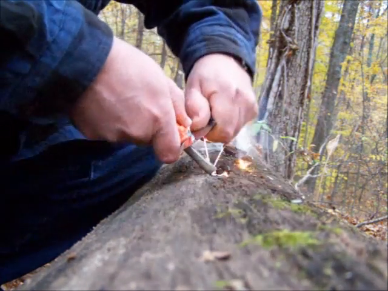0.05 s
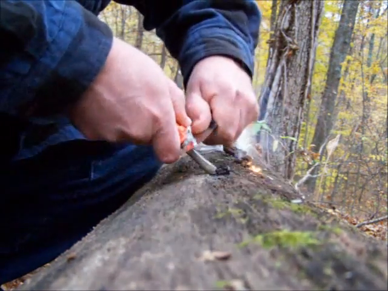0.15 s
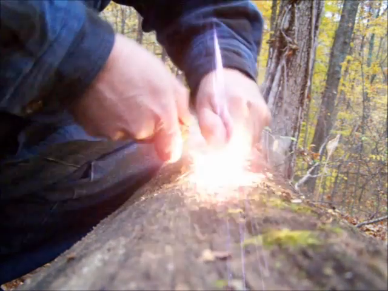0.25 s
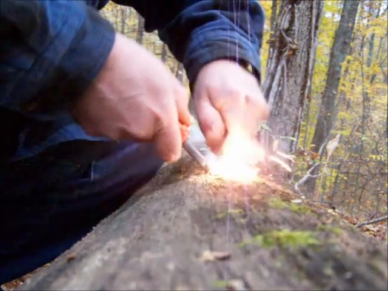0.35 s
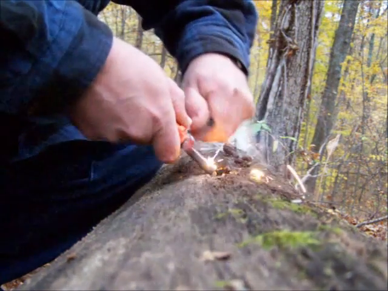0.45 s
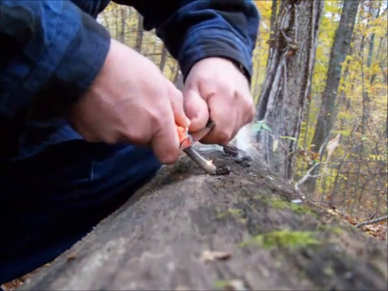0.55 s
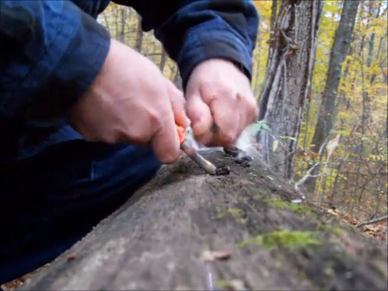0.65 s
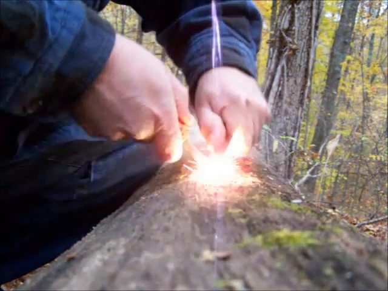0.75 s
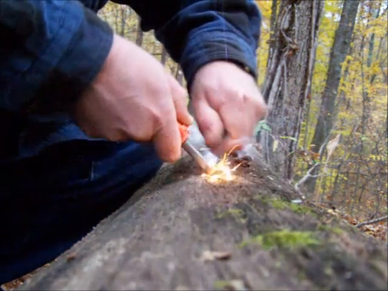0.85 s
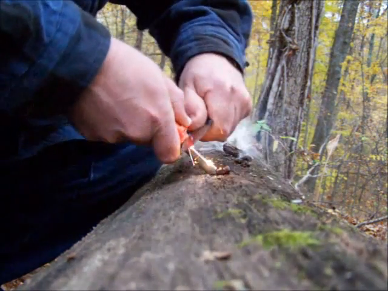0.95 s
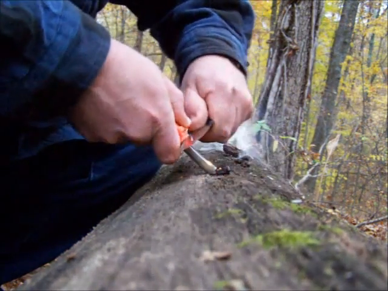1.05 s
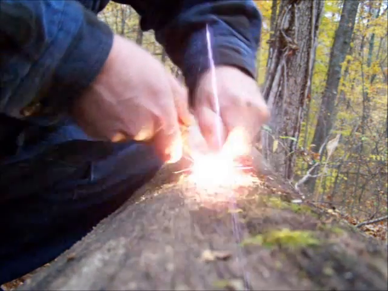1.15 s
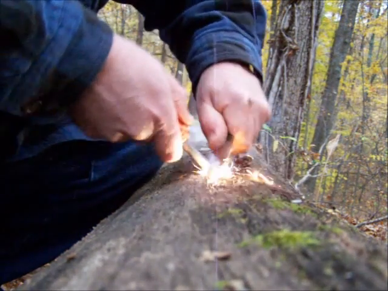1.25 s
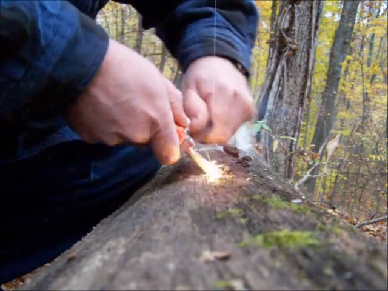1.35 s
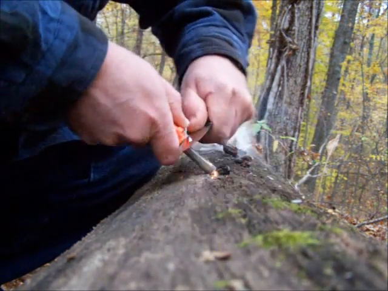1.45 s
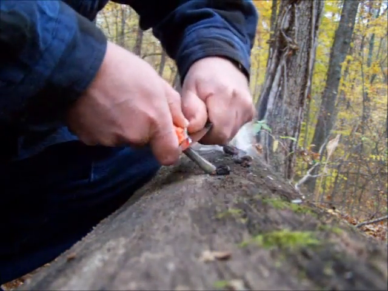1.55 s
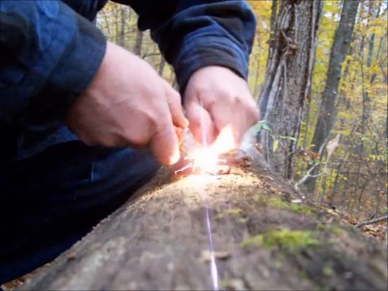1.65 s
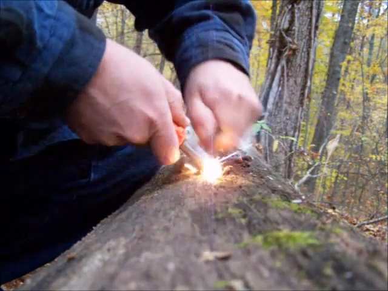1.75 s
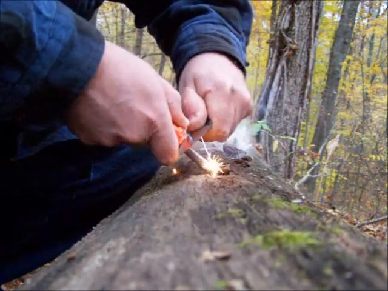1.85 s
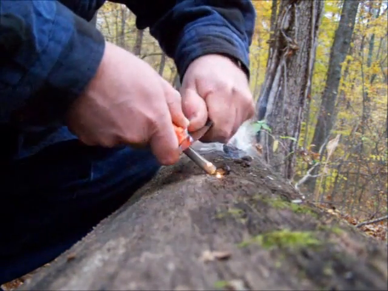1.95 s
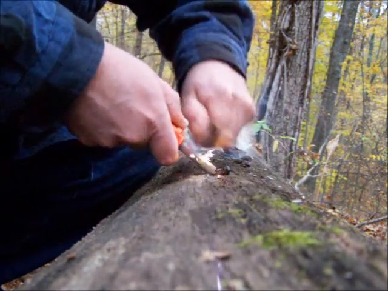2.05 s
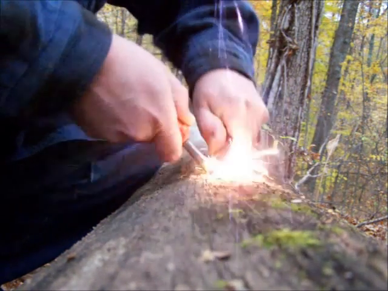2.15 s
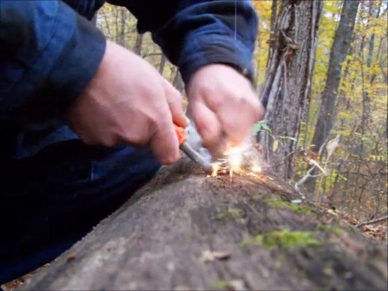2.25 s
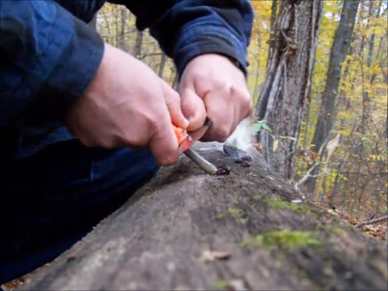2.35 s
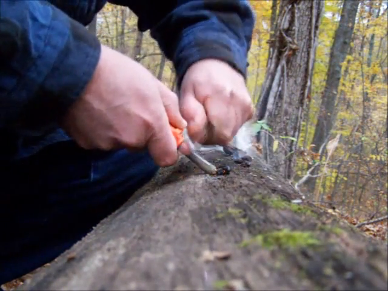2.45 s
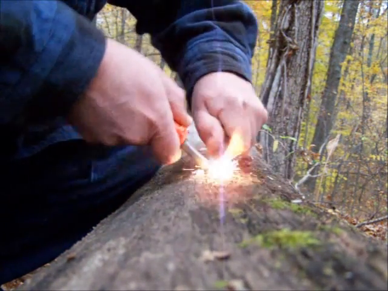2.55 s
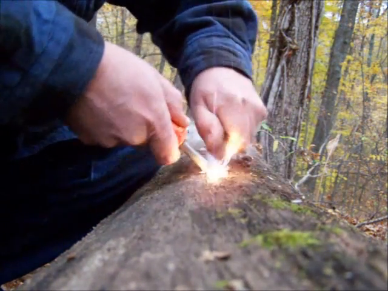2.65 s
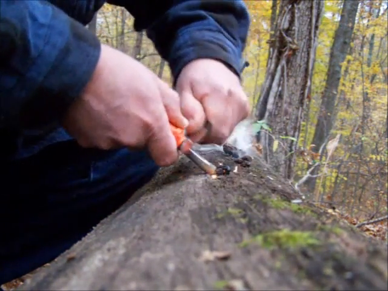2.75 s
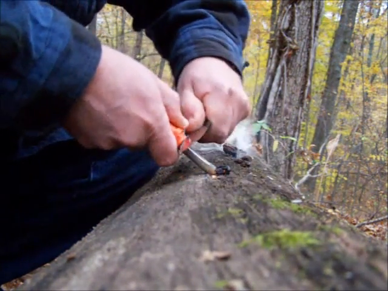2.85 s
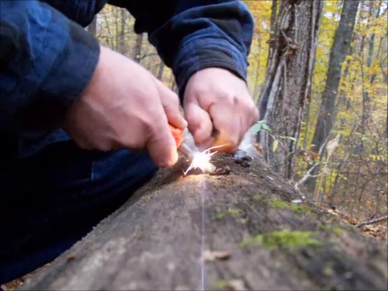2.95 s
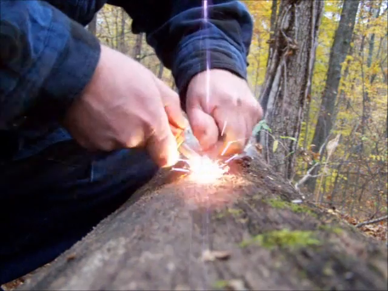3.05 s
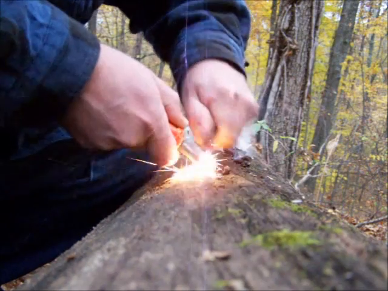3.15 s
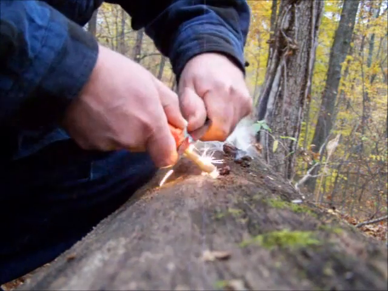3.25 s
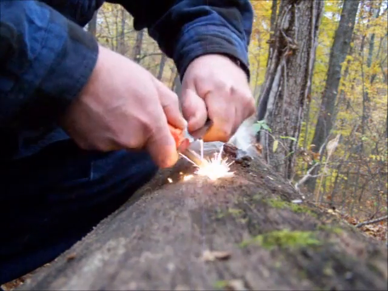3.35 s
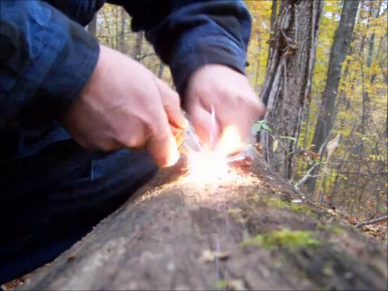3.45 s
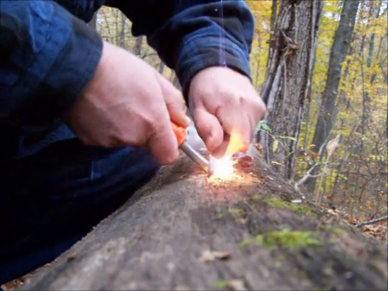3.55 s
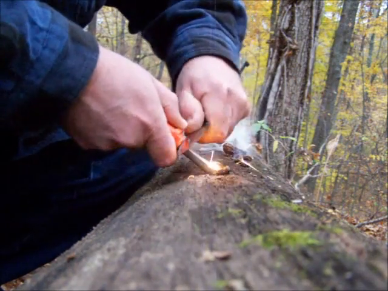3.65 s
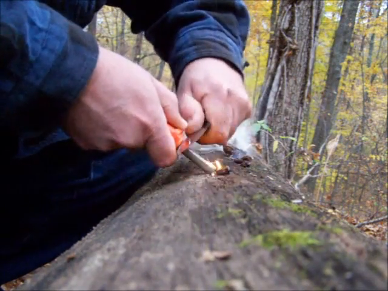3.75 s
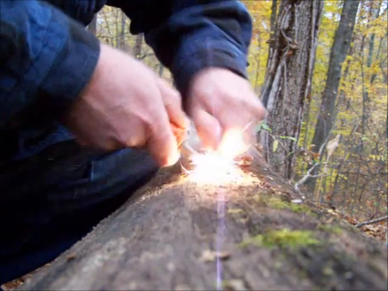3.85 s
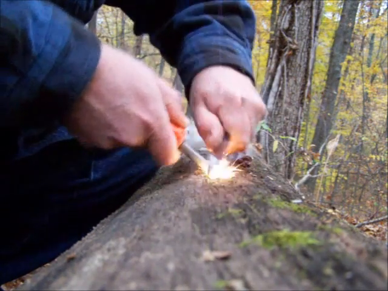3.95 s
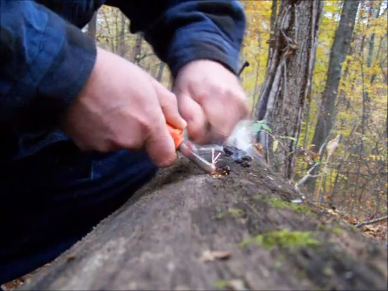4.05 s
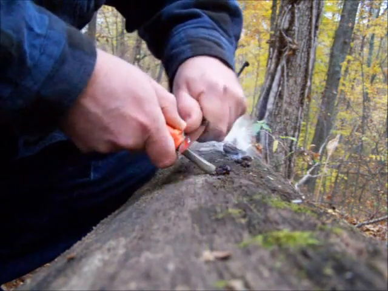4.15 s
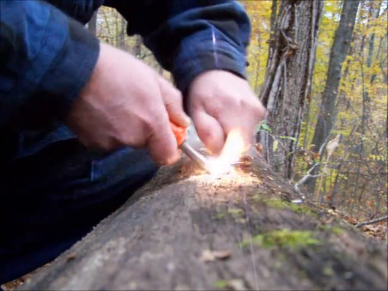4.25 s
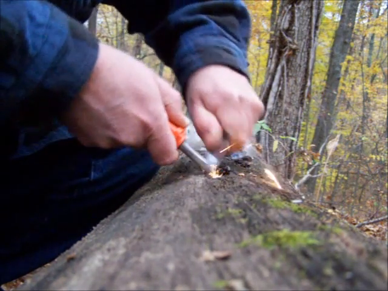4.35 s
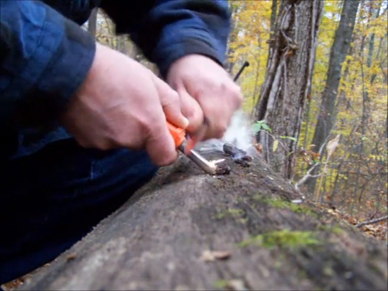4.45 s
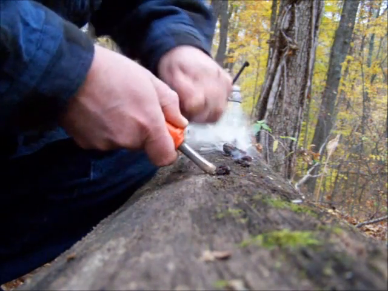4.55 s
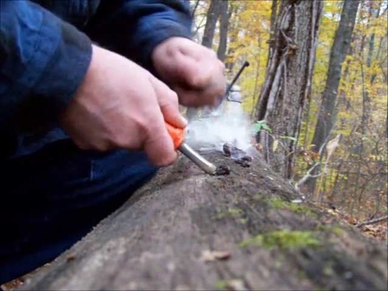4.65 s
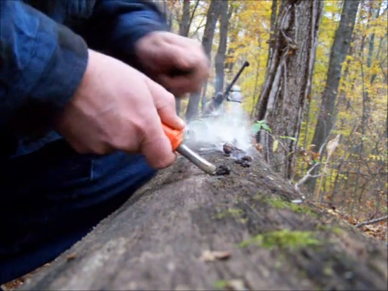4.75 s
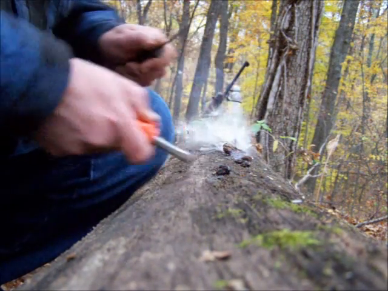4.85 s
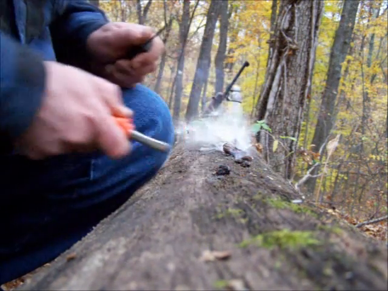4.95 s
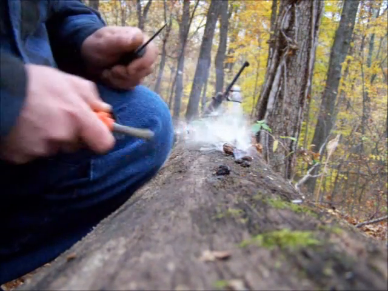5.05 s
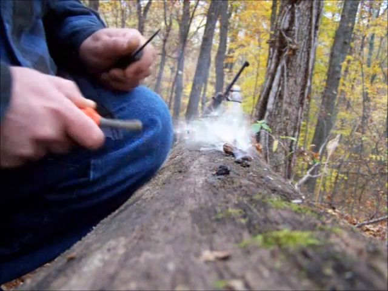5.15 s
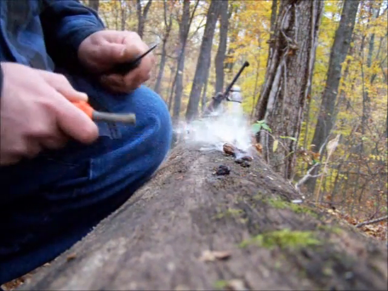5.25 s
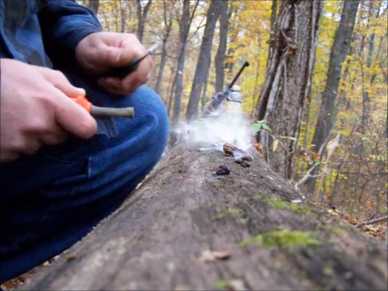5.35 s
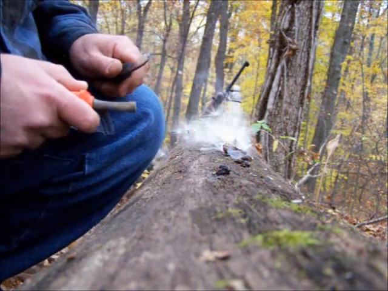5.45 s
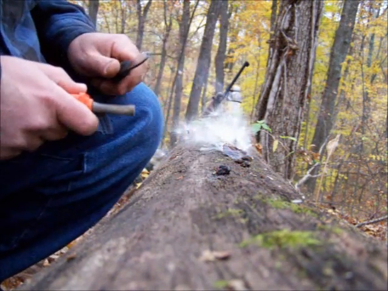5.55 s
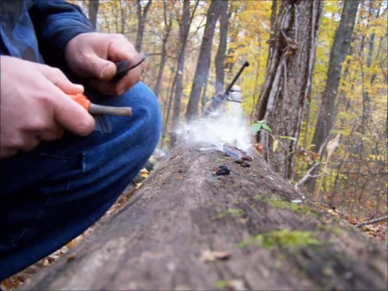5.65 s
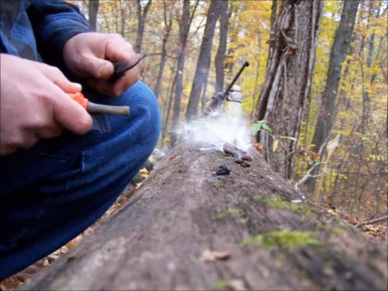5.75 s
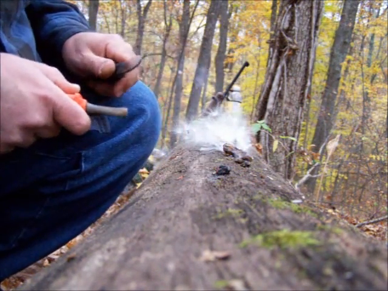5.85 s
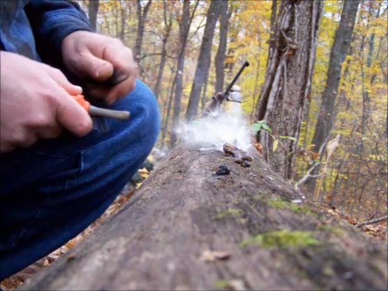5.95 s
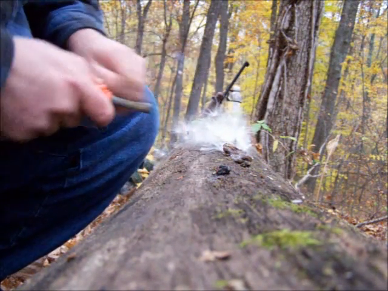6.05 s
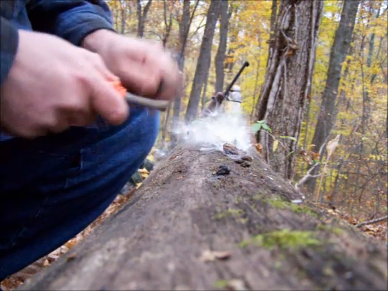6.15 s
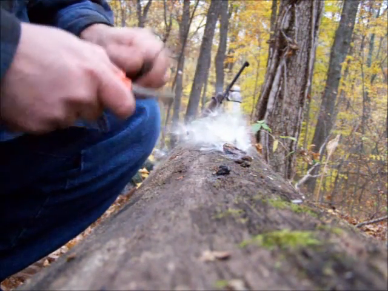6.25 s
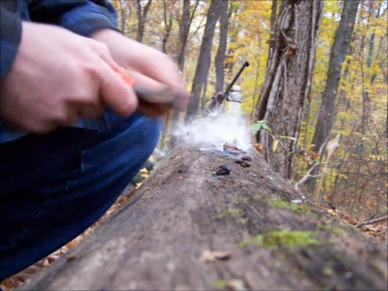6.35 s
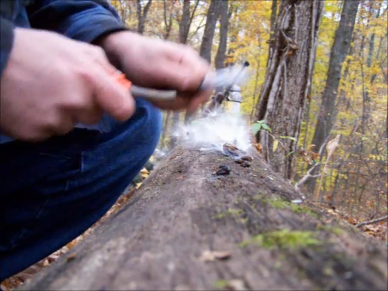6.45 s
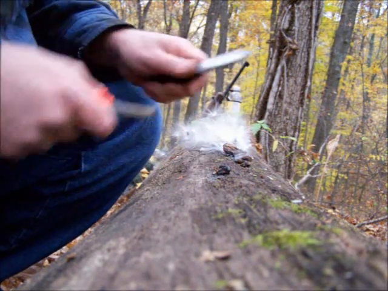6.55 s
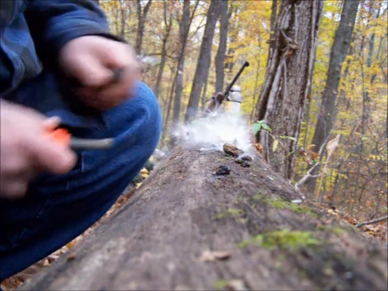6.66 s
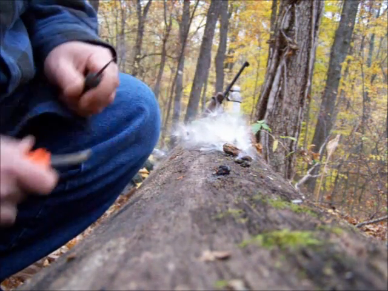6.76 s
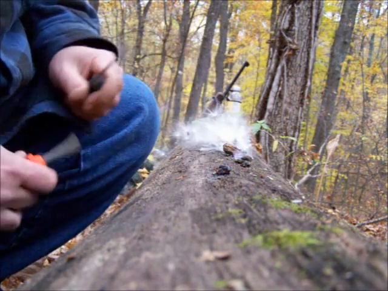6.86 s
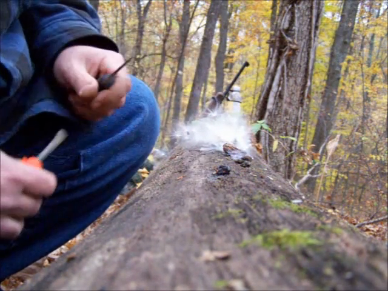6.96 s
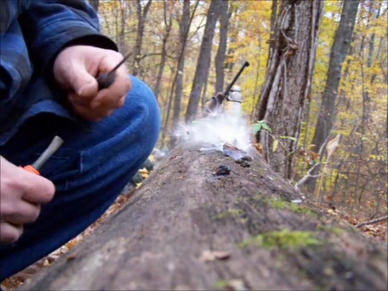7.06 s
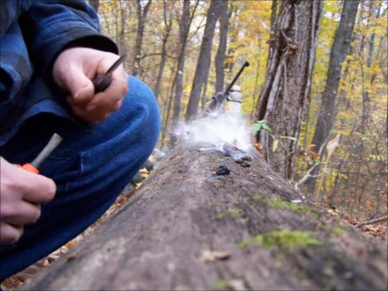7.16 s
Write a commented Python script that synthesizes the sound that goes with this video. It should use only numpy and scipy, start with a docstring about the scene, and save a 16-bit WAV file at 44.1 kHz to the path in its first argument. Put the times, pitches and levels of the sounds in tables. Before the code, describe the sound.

A steel blade rasps down a fire-starting rod about twice a second, tearing off crackling sparks, then two sharp clinks over faint hiss and hum.

```python
"""A steel blade scrapes along a ferro rod about twice a second, as someone kneels at a log in a wood.
Each push tears off crackling sparks, made of random grains; the return is a lighter, ringing rasp.
Sharp impulses through resonances make the ticks, knocks on the log and snapping twigs.
Later the blade clinks twice, as fading sine waves, and dry leaves rustle under the shifting body.
Behind it are a far engine built from sine waves, a faint drone and a steady hiss of shaped noise."""
import sys
import numpy as np
from scipy import signal
from scipy.fft import rfft, irfft
from scipy.io import wavfile
from scipy.ndimage import uniform_filter1d

SR = 44100
rng = np.random.default_rng(int(sys.argv[2]) if len(sys.argv) > 2 else 0)


def master(y):
    """Save y as 16-bit WAV."""
    cut = np.clip(np.atleast_2d(y).T, -1, 1)
    pcm = np.round(cut * 32767)  # scale
    wavfile.write(sys.argv[1], SR, pcm.astype(np.int16))


N = 318402
TIME = np.arange(N) / SR   # seconds
# Table levels are relative: each layer adds its own level on top.

# The edge is pushed down the rod:
# (time [s], time to the crest [s], time after it [s], crest level [dB],
#  swell from ends to crest [dB], relative ring of the rod [dB])
PUSHES = [(.04, .068, .057, -15.5, 16, -4.5), (.5, 0.11, 0.082, -16.5, 18, -4.5),
          (.985, 0.077, 0.058, -15, 19, -4.5), (1.441, 0.095, 0.066, -17, 7.5, -4.5),
          (1.905, 0.062, 0.051, -15, 9.5, -3.5), (2.345, 0.07, 0.066, -17.5, 10, -4.5),
          (2.8, .143, 0.03, -20.5, 4, -5.5), (3.02, 0.036, 0.094, -23, 9.5, -5.5),
          (3.231, 0.08, 0.052, -15, 13.5, -4), (3.678, 0.05, 0.055, -16, 7, -4),
          (4.078, 0.095, 0.015, -20.5, 5, -1.5)]
# The edge digs in as the push goes on:
# (phase [-1 start, 0 crest, 1 end], relative bite of the edge [dB], change of the ring [dB])
PUSH_GRIP = [(-1.12, -17.5, -9.5), (-0.057, -9, 0), (0.63, -3, -4)]
# The blade is drawn back, dragging and then singing:
# (time [s], time to the crest [s], drag level [dB], singing level [dB],
#  half-width of the singing [s], relative bite at the start [dB])
RETURNS = [(.188, 0.082, -28.5, -22, 0.015, -7), (.725, 0.049, -27, -20.5, 0.015, -6),
           (1.108, .12, -24.5, -16, 0.013, -7), (1.641, 0.063, -24.5, -18.5, 0.015, -7),
           (2.08, 0.067, -27.5, -19, 0.015, -7), (2.515, 0.081, -26, -20.5, .015, -8.5),
           (3.172, .045, -28.5, -31.5, .02, 0), (3.379, 0.061, -32.5, -23, 0.011, -6),
           (3.468, 0.013, -24, -21, 0.021, -8), (3.815, 0.085, -28, -22, 0.017, -6.5),
           (4.264, 0.053, -27, -20.5, 0.0081, -11.5)]
SWELL_POWER = 1   # roundness of the crest
PUSH_PITCH, RETURN_PITCH = 0.99, 1   # factor on the resonances
# the drag eases as the hand comes up
DRAG_RING_DB, DRAG_FADE_DB_PER_S, BITE_FADE_DB_PER_S = -7.5, 50.5, 45
RUN_OUT_S = 0.024   # the blade stays on the rod this long after the crest


def pushes(t):
    """Each push swells to a crest, and the edge digs in along the way."""
    for start_s, rise_s, fall_s, crest_db, swell_db, ring_db in PUSHES:
        phase = np.interp(t, [0, rise_s, rise_s + fall_s], [-1, 0, 1])
        swell = from_db(crest_db - swell_db * np.abs(phase) ** SWELL_POWER)
        gain = swell * touching(t, rise_s + fall_s)
        bite_db, ring_change_db = in_time(PUSH_GRIP, phase)
        yield start_s, gain, bite_db, ring_db + ring_change_db, PUSH_PITCH


def returns(t):
    """Each return drags with a fading bite, then sings as it slides lightly."""
    for start_s, rise_s, drag_db, sing_db, half_s, bite_start_db in RETURNS:
        drag = from_db(drag_db - DRAG_FADE_DB_PER_S * t) * touching(t, rise_s + RUN_OUT_S)
        singing = from_db(sing_db) * hump(t - rise_s, half_s)
        both = np.hypot(drag, singing) + 1e-9
        drag_share_db = 20 * np.log10(drag / both + 1e-9)
        gain = both * touching(t, rise_s + 2 * half_s)
        bite_db = bite_start_db + drag_share_db - BITE_FADE_DB_PER_S * t
        yield start_s, gain, bite_db, DRAG_RING_DB + drag_share_db, RETURN_PITCH


# Resonances of the sliding blade: (frequency [Hz], width [Hz], level [dB])
SLIDE_MODES = [(517, 140, -22), (1300, 200, -23.5), (2230, 245, -7.5), (3425, 254, -2.5), (3846, 162, 3.5),
               (4404, 253, -1), (5900, 230, -23.5), (6170, 230, -11), (7080, 210, -34.5)]
# Resonances of blade and rod while the edge cuts: (frequency [Hz], width [Hz], level [dB])
CUT_MODES = [(527, 1250, -16), (1610, 530, -3), (2385, 590, -4), (3324, 640, 3), (4400, 570, 3),
             (5540, 350, 0), (6290, 410, -5), (7160, 460, -5)]
# the pressure of the hand wavers
UNEVEN_PER_S, UNEVEN_LEVEL_DB, UNEVEN_BITE_DB = 71.3, 0.93, 1.75


def scrapes(cut_db, rod_db, judder_rate, judder_db, wander, level_db):
    """Sliding lightly, the blade sings; where it bites, it tears off crackling grains and the rod rings."""
    out, t = np.zeros(N), np.arange(12288) / SR
    for start_s, gain, bite_db, ring_db, pitch in [*pushes(t), *returns(t)]:
        pressure = drift(UNEVEN_PER_S, size=len(t))
        gain = gain * from_db(UNEVEN_LEVEL_DB * pressure)
        bite_db = bite_db + UNEVEN_BITE_DB * pressure
        slips = drift(judder_rate, size=len(t))
        friction = grains(per_s=14000, spread_db=1.0, size=len(t)) * from_db(0.2 * judder_db * slips)
        tearing = grains(per_s=7000, spread_db=3.0, size=len(t)) * from_db(judder_db * slips)

        # the grip differs from stroke to stroke and moves the resonances a little
        shift = pitch + wander * rng.normal()
        blade = evened(body(friction, regripped(SLIDE_MODES, spread_db=1.5), shift))
        rod_mode = [(3080, 143, 0)]   # frequency [Hz], width [Hz], level [dB]
        rod = evened(body(body(tearing, rod_mode, shift), rod_mode, shift))

        # the shavings ignite and add a broad fizz
        fizz = signal.sosfilt(signal.butter(1, 300, "high", fs=SR, output="sos"), tearing)
        cut_ring = body(tearing, regripped(CUT_MODES, spread_db=1.03), shift)
        cut = evened(cut_ring + from_db(-19.5) * fizz)

        # the three share the power of the stroke
        cut_share = np.clip(from_db(bite_db + cut_db) ** 2, 0, .9)
        rod_share = np.clip(from_db(ring_db + rod_db) ** 2 - 0.33 * cut_share, 0, .6)
        blade_share = np.clip(1 - cut_share - rod_share, .03, 1)
        mix = np.sqrt(cut_share) * cut + np.sqrt(rod_share) * rod + np.sqrt(blade_share) * blade
        add(out, start_s, evened(mix) * gain * from_db(level_db))
    return out


# Loudest pops of sparks and ticks of the edge on the rod: (time [s], peak level [dB])
TICKS = [(.2014, -14), (.6522, -10), (.823, -18), (1.1163, -6.5), (1.145, -8), (1.62, 0), (1.645, -17),
         (1.768, -13.5), (2.41, -3), (2.4776, 1), (2.516, -12), (2.88, -13), (2.903, -8), (2.9487, -5),
         (2.9803, -11), (3.0217, -5), (3.0829, -6), (3.1793, -6.5), (3.2166, -8), (3.4948, 0.5),
         (3.614, -14.5), (3.7287, -3.5), (4.2184, -3.5), (4.2735, -5.5), (4.3203, -0.5), (5.1332, -4.5)]
# Resonances of the ticks: (frequency [Hz], width [Hz], level [dB])
TICK_MODES = [(1710, 1500, -14.5), (3960, 550, 2.5), (4760, 1050, -1.5), (6180, 2160, -8.5)]


def ticks(wander, level_db):
    """Sparks pop and the edge ticks: sharp impulses through broad, quickly fading resonances."""
    return snaps(scattered(TICKS, wander), TICK_MODES, crumble_s=0.0035, crumble_db=-28, level_db=level_db)


# The blade runs off the rod and knocks on the log: (time [s], peak level [dB], pitch [factor])
KNOCKS = [(3.7585, -8.5, 1.03), (4.1775, -5.5, 0.984)]
# Resonances of the log: (frequency [Hz], width [Hz], level [dB])
LOG_MODES = [(486, 250, -12.5), (1290, 290, -6.5), (1680, 230, 4.5), (2460, 350, -8), (3250, 360, -0.5)]


def knocks(level_db):
    """A blow with a strong, brief crumble sets the log's resonances going."""
    return snaps(KNOCKS, LOG_MODES, crumble_s=0.0021, crumble_db=-4.0, level_db=level_db)


# The blade clinks and rebounds:
# (time [s], level [dB], firmness [0-1], pitch [factor], jolt of the handle [dB])
CLINKS = [(5.971, 8, 0.9, 1.015, -13), (5.9757, -4.5, .05, 1, -35), (5.9875, -0.5, .15, 1, -23),
          (6.004, -8, .25, 0.91, -21), (6.0112, 1.5, 0.43, .98, -25), (6.0138, 3, 0.62, .97, -9),
          (6.1876, 8, 1, 1, 1.5), (6.1896, 4.5, .9, 0.89, -3.5), (6.2013, -9, 0, 1.03, -30),
          (6.2181, -6.5, .6, 1.07, -14), (6.2221, -3, 1, 1.03, -7)]
# The blade ringing freely: (frequency [Hz], level [dB])
BLADE_MODES = [(3370, -7), (3560, -0.5), (3860, -2), (3990, 3.5), (4140, -4.5), (4450, -19), (5250, -11.5),
               (5680, -12), (7300, -27.5)]
# a firm touch cracks more and rings less: (loose, firm); T60 is the time to fade by 60 dB, before damping
CLINK_T60_S, CLINK_CRACK_DB = (.11, 0.018), (-24, -7)


def clinks(held_s, level_db):
    """Each touch cracks and sets the blade ringing until the hand damps it; the grip bends the pitch."""
    out, t = np.zeros(N), np.arange(4096) / SR
    hz, mode_db = np.transpose(BLADE_MODES)[:, :, None]
    for start_s, db, firmness, pitch, _ in CLINKS:
        t60 = np.exp(np.interp(firmness, [0, 1], np.log(CLINK_T60_S)))
        crack_db = np.interp(firmness, [0, 1], CLINK_CRACK_DB)
        strength = from_db(mode_db + rng.normal(0, 0.64, hz.shape))
        waves = np.sin(2 * np.pi * (pitch * hz * t + rng.random(hz.shape)))
        ring = (strength * waves).sum(0) / np.sqrt(np.sum(strength ** 2)) / 2
        onset = 1 - np.exp(-(t / .0004) ** 2)
        hand_damping = 1 / (1 + (t / held_s) ** 8)
        ring = ring * from_db(-60 * t / t60) * onset * hand_damping
        crack = body(rng.standard_normal(len(t)) * np.exp(-t / 0.0023), TICK_MODES)
        crack = from_db(crack_db) * crack / np.abs(crack).max()
        add(out, start_s, from_db(db + level_db) * (ring + crack))
    return out


# A blunt blow through handle and hand: (frequency [Hz], width [Hz], level [dB])
HANDLE_MODES = [(505, 241, -9), (1150, 266, -2.5), (1700, 130, -0.5), (2090, 150, 7.5), (2920, 473, -4),
                (5260, 850, 3), (7170, 400, -10)]


def jolts(wander, level_db):
    """Each clink also jolts the handle, whose resonances give a blunt blow."""
    events = scattered([(s, jolt_db) for s, *_, jolt_db in CLINKS], wander)
    return snaps(events, HANDLE_MODES, crumble_s=0.0026, crumble_db=-16, level_db=level_db)


# Dry leaves and twigs snapping: (time [s], peak level [dB], pitch [factor])
TWIGS = [(4.4608, -20, 1.17), (4.6723, -18.5, 1.18), (4.7098, -11, 1.02), (4.7552, -18.5, 1.03),
         (4.7987, -11, 1), (5.8988, -15.5, 1.04), (6.6534, -13.5, 0.91), (6.6662, -14.5, 0.92),
         (6.8541, -12.5, 0.89), (6.982, -14, 1.12), (7.066, -13.5, 1.03), (7.1804, -15, 1.05),
         (7.2135, -7, 0.95)]
# Resonances of leaves and twigs: (frequency [Hz], width [Hz], level [dB])
TWIG_MODES = [(1400, 570, -11.5), (2420, 800, -8.5), (3356, 450, 0), (3795, 554, 2), (4350, 1740, -6),
              (6500, 2900, -21)]


def twigs(level_db):
    """A twig breaks with one sharp impulse and a short crumble, coloured by its resonances."""
    return snaps(TWIGS, TWIG_MODES, crumble_s=0.0038, crumble_db=-15.0, level_db=level_db)


# The body shifts, leaves and clothing rustle: (time of the crest [s], half-width [s], level [dB])
RUSTLES = [(4.789, 0.035, -38.5), (4.95, 0.063, -35.5), (5.44, 0.056, -41), (5.88, 0.11, -42.5),
           (6.68, 0.055, -42), (7.14, 0.023, -34.5)]
RUSTLE_REST_DB = -46.5   # between the moves, before the layer's level


def rustle(level_db):
    """Dry leaves crackle in small clumps, swelling with each move."""
    swells = sum(from_db(db) * hump(TIME - s, half_s) for s, half_s, db in RUSTLES)
    moves = from_db(RUSTLE_REST_DB) + swells
    crackle = grains(1500, 3.8, size=N) * from_db(3.0 * drift(70, size=N))
    return from_db(level_db) * moves * rms_one(body(crackle, TWIG_MODES, shift=1.073))


# Level of the engine: (time [s], fundamental level [dB], overtone level [dB])
ENGINE = [(0.0, -46, -48), (0.04, -42.5, -47.5), (0.36, -43.5, -54), (0.9, -41, -46), (1.22, -39, -50),
          (1.67, -36, -40.5), (2.37, -35.5, -44.5), (3.14, -41.5, -44.5), (3.42, -46, -55.5),
          (4.02, -45.5, -60), (4.32, -44, -54), (5.45, -50.5, -52), (6.27, -46.5, -54.5),
          (6.67, -42.5, -46.5), (7.22, -46.5, -44.5)]
# Overtones of the four-cylinder cycle: (multiple of the cycle rate, level [dB])
ENGINE_ORDERS = [(5, -13), (7, -15), (8, 0), (9, -10), (11, -10), (12, -11), (13, -13), (15, -16)]
FIRING_HZ, FIRING_WANDER_HZ = 74.27, .3


def engine(waver_db, level_db):
    """Four firings a cycle give the hum; uneven cylinders add weak orders between its overtones."""
    low_db, over_db = in_time(ENGINE)
    firing_hz = FIRING_HZ + FIRING_WANDER_HZ * drift(2, size=N)
    cycle = 2 * np.pi * np.cumsum(firing_hz) / SR / 4   # angle of the cycle, in radians
    out = from_db(low_db) * np.sin(4 * cycle)
    for order, db in ENGINE_ORDERS:
        gain = from_db(over_db + db + waver_db * drift(6, size=N))
        out += gain * np.sin(order * cycle + 2 * np.pi * rng.random())
    return np.sqrt(2) * from_db(level_db) * out


# Level of the distant drone: (time [s], level [dB])
DRONE = [(0, -58), (1.2, -55.5), (4.4, -56), (5, -61), (6.1, -68.5), (6.5, -49), (7.22, -59)]
# Resonances of the drone: (frequency [Hz], width [Hz], level [dB])
DRONE_MODES = [(498, 190, -1), (1186, 330, -0.5)]


def drone(level_db):
    """Noise through the same resonances twice gives a faint distant drone."""
    curve_db, = in_time(DRONE)
    tone = rms_one(body(body(rng.standard_normal(N), DRONE_MODES), DRONE_MODES))
    return from_db(curve_db + level_db) * tone


# Steady air and hiss: (frequency [Hz], relative level per Hz [dB])
AIR = [(25, -13.5), (50, -7.5), (90, -2.5), (200, -5.5), (330, -9), (520, -8), (900, -12), (1400, -13),
       (2000, -11), (2900, -4), (3650, 1), (4400, -6), (5300, -9), (7600, -23.5)]


def hiss(level_db):
    """Steady noise, its spectrum drawn point by point for a smooth hiss."""
    hz, db = np.transpose(AIR)
    bin_hz = np.arange(N // 2 + 1) * SR / N
    shape_db = np.interp(np.log(bin_hz + 1), np.log(hz), db)
    noise = irfft(rfft(rng.standard_normal(N)) * from_db(shape_db), N)
    return from_db(level_db) * rms_one(noise)


def snaps(events, modes, crumble_s, crumble_db, level_db):
    """Short contacts on a damped body, each with its own pitch and peak level."""
    out = np.zeros(N)
    for start_s, db, pitch in events:
        snap = body(contact(crumble_s, crumble_db), modes, pitch)
        add(out, start_s, snap * from_db(db + level_db) / np.abs(in_band(snap)).max())
    return out


def contact(crumble_s, crumble_db, size=2048):
    """One sharp impulse and a short crumbling after it."""
    force = from_db(crumble_db) * rng.standard_normal(size) * np.exp(-np.arange(size) / SR / crumble_s)
    force[0] = 1
    return force


def scattered(events, wander):
    """Give each (time, level) contact a chance pitch factor."""
    return [(s, db, 1 + wander * np.clip(rng.normal(), -2, 2)) for s, db in events]


def grains(per_s, spread_db, size):
    """Tiny fractures at random moments, mostly small and a few large; unit power."""
    chance, big, sign = rng.random(size), rng.exponential(1, size), rng.choice([-1, 1], size)
    heights = from_db(spread_db * np.minimum(big, 4)) * sign
    return rms_one((chance < per_s / SR) * heights)


def body(x, modes, shift=1):
    """Parallel resonances of alternating sign, all moved by the factor shift."""
    out = 0
    for k, (hz, width, db) in enumerate(modes):
        r = np.exp(-np.pi * width / SR)   # a wider resonance fades sooner
        w = 2 * np.pi * hz * shift / SR
        gain = (-1) ** k * from_db(db) * (1 - r * r) / 2
        out = out + gain * signal.lfilter([1, 0, -1], [1, -2 * r * np.cos(w), r * r], x)
    return out


def regripped(modes, spread_db):
    """A new point of contact favours some resonances over others."""
    return [(hz, width, db + spread_db * rng.normal()) for hz, width, db in modes]


def touching(t, length_s):
    """The edge lands on the rod at t = 0 and leaves it after length_s."""
    touch_s, lift_s = 0.0027, .007
    return np.clip(t / touch_s, 0, 1) * np.exp(-np.maximum(t - length_s, 0) / lift_s)


def hump(t, half_s):
    """A smooth swell of height 1 around t = 0."""
    return 1 / np.cosh(np.clip(t / half_s, -30, 30))


def drift(rate, size):
    """Smooth chance with spread about 1, heading for a new value rate times a second."""
    at = np.arange(size) * rate / SR + rng.random()
    return np.interp(at, np.arange(size // 8), rng.standard_normal(size // 8)) * np.sqrt(3 / 2)


def evened(x):
    """Near unit power over every 15 ms; faster crackle stays."""
    x = in_band(x)
    return x / np.sqrt(np.abs(uniform_filter1d(x ** 2, size=660)) + 1e-9)


def from_db(db):
    """Decibels to gain."""
    return 10 ** (np.asarray(db) / 20)


def rms_one(x):
    """Scale to unit power."""
    return x / np.sqrt(np.mean(x ** 2) + 1e-20)


def in_time(rows, t=TIME):
    """Each column of a curve table, read at the points t of its first column."""
    s, *columns = np.transpose(rows)
    return [np.interp(t, s, c) for c in columns]


def add(out, s, sound):
    """Mix a sound in at time s."""
    i = max(int(round(s * SR)), 0)
    out[i:i + len(sound)] += sound[:max(N - i, 0)]


def in_band(x):
    """The steep top edge of the microphone channel, at 7720 Hz."""
    return signal.sosfilt(signal.ellip(8, .5, 70, 7720, fs=SR, output="sos"), x)


def scene():
    """Everything is dry and heard by one microphone, the same on both channels."""
    rasp = scrapes(cut_db=7.5, rod_db=1.5, judder_rate=330, judder_db=2.5, wander=0.009, level_db=0.0)
    taps = ticks(wander=0.044, level_db=0.5) + knocks(level_db=1.5)
    steel = clinks(held_s=0.02, level_db=0.8) + jolts(wander=0.021, level_db=-2.1)
    leaves = twigs(level_db=-1.5) + rustle(level_db=0.0)
    around = engine(waver_db=1.0, level_db=0.6) + drone(level_db=5.0) + hiss(level_db=-36.0)
    return np.tile(rasp + taps + steel + leaves + around, (2, 1))


def limiter(x, threshold_db, release_db_per_s):
    """The gain ducks after loud hits and creeps back."""
    keep = np.exp(-1 / (0.0042 * SR))   # 4.2 ms smoothing
    power = signal.lfilter([1 - keep], [1, -keep], x[0] ** 2)
    over_db = np.maximum(10 * np.log10(power + 1e-12) - threshold_db, 0)
    release_db = release_db_per_s * TIME
    held_db = np.maximum.accumulate(over_db + release_db) - release_db
    return x * from_db(-signal.lfilter([1 - keep], [1, -keep], held_db))


def record(dry):
    """A narrow-band channel with a limiter; peaks beyond full scale are cut flat, then smoothed at 16 kHz."""
    limited = limiter(dry, threshold_db=-9.5, release_db_per_s=45)
    loud = np.clip(in_band(limited), -1, 1)
    return signal.sosfilt(signal.ellip(8, .1, 70, 16000, fs=SR, output="sos"), loud)


dry = scene()
out = record(dry)
master(out)
```